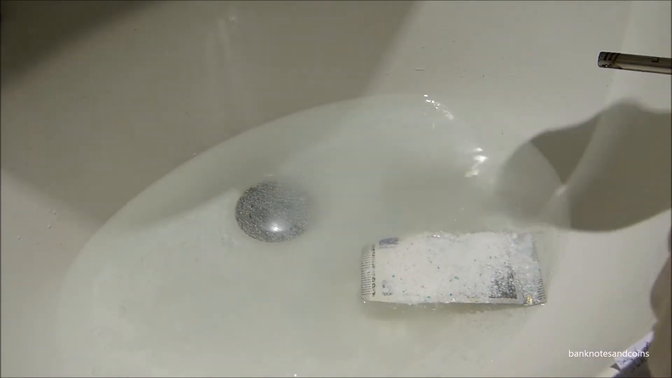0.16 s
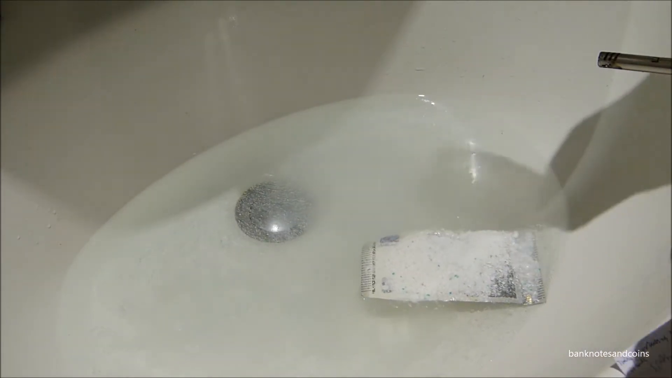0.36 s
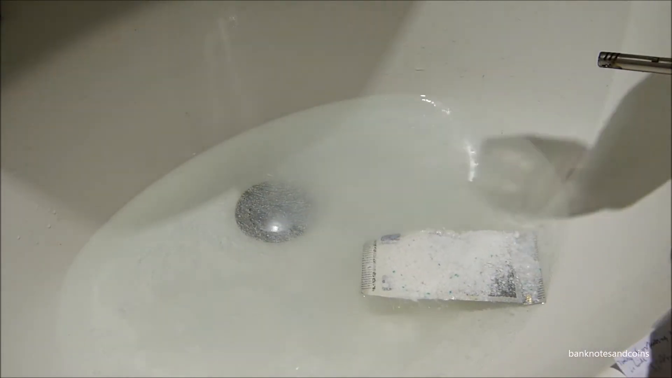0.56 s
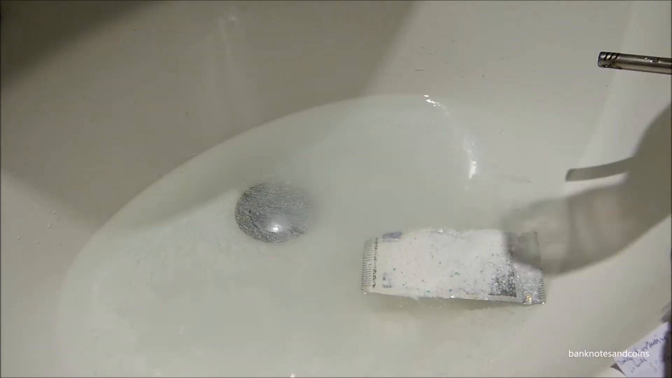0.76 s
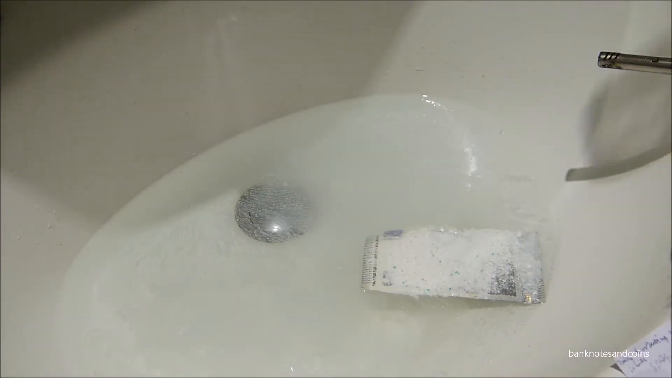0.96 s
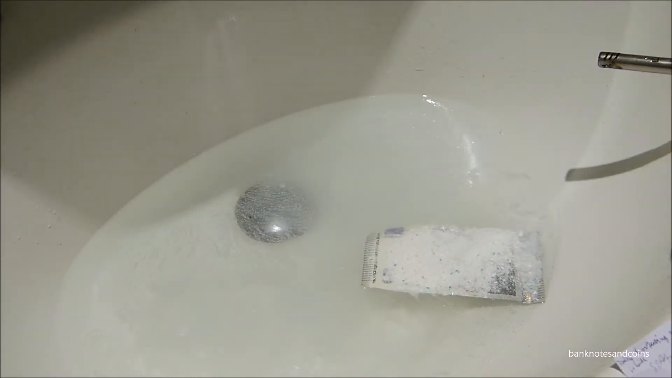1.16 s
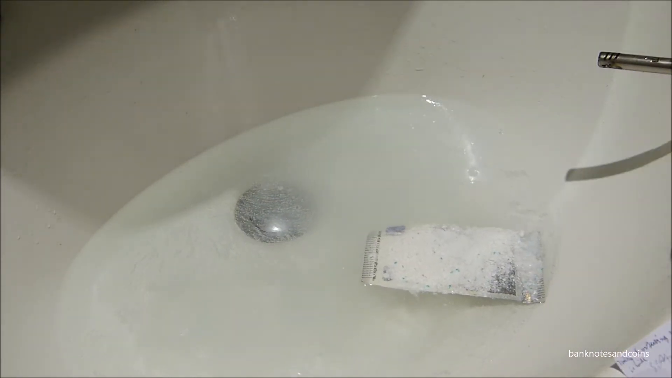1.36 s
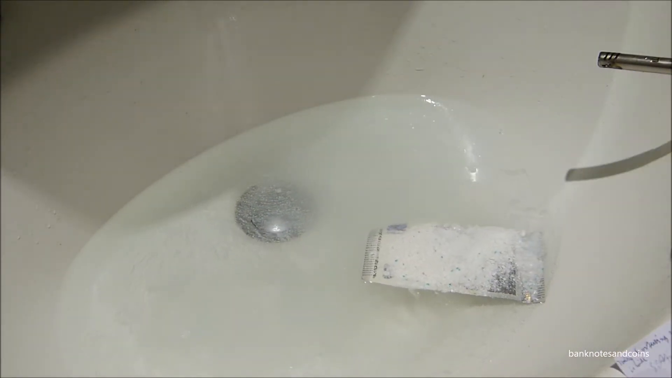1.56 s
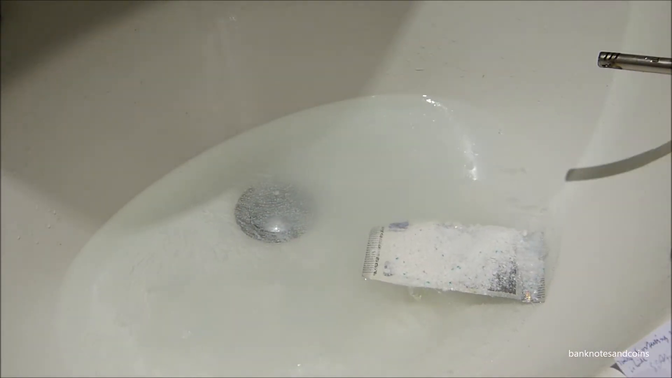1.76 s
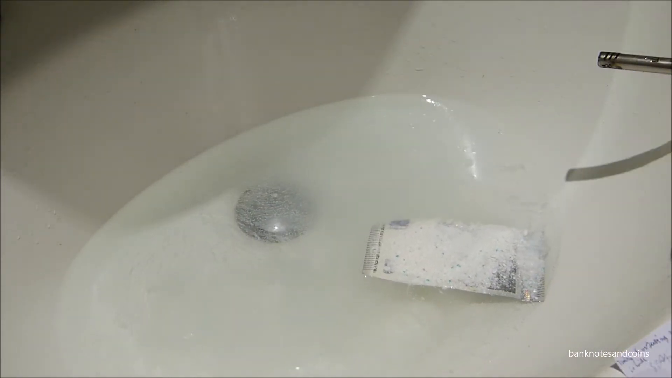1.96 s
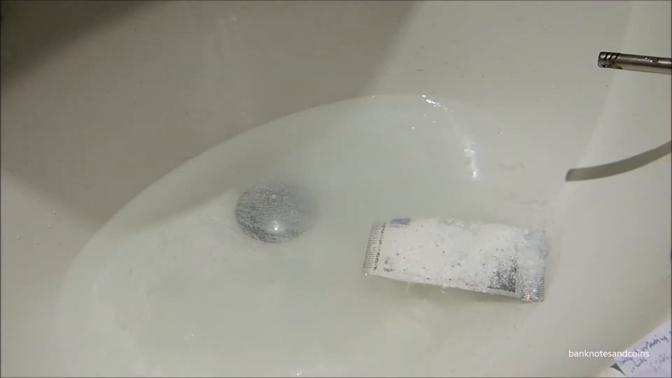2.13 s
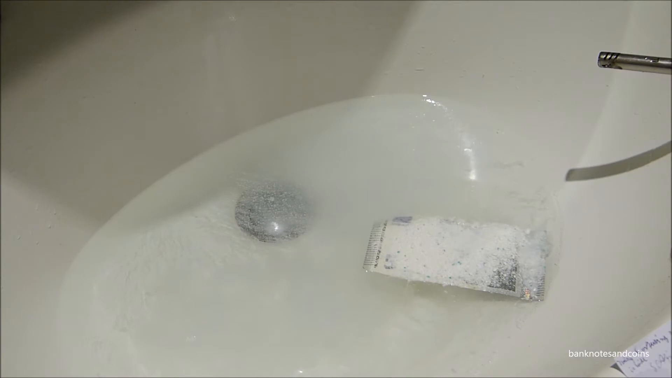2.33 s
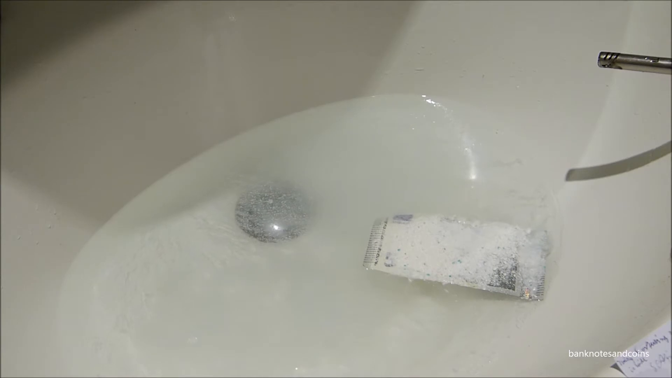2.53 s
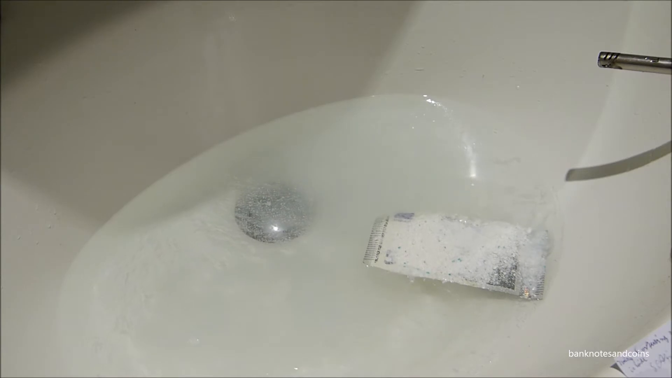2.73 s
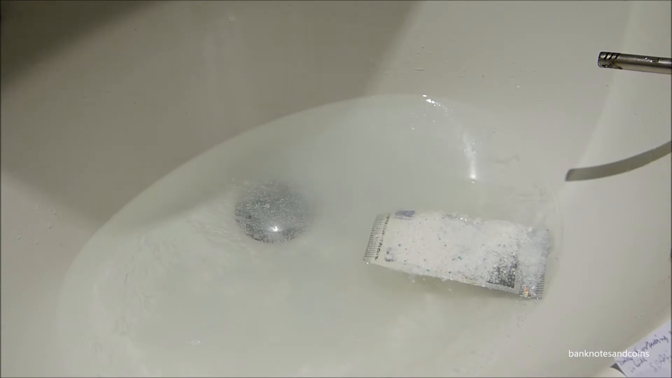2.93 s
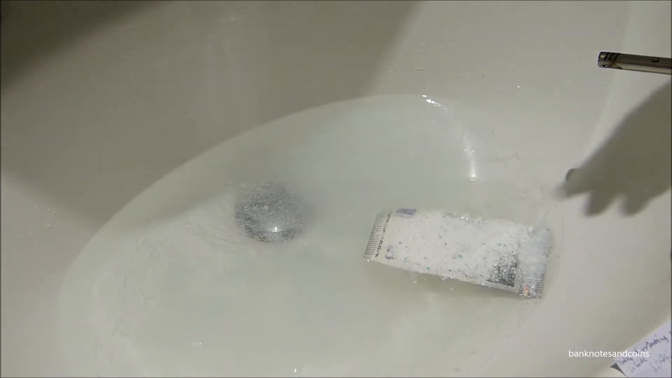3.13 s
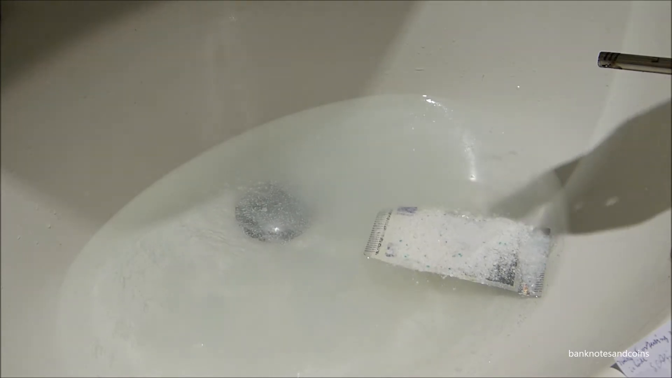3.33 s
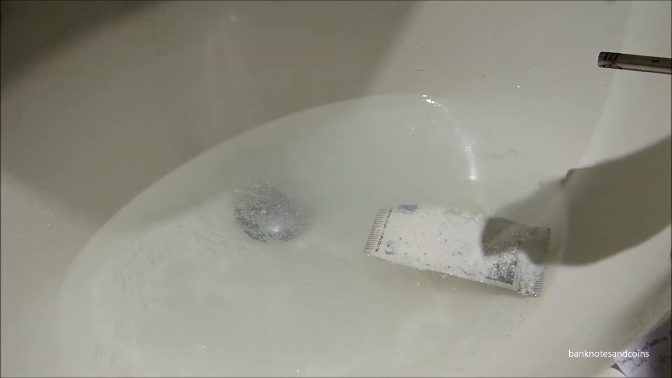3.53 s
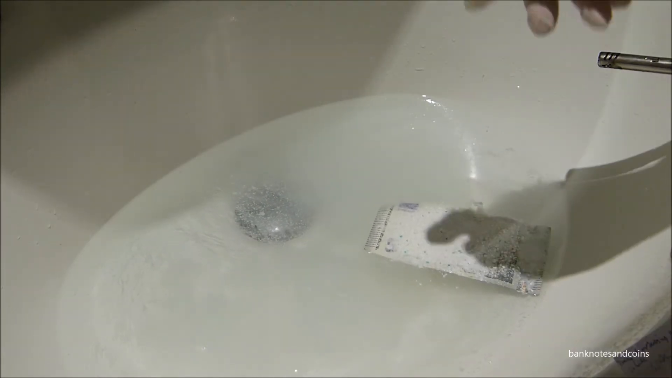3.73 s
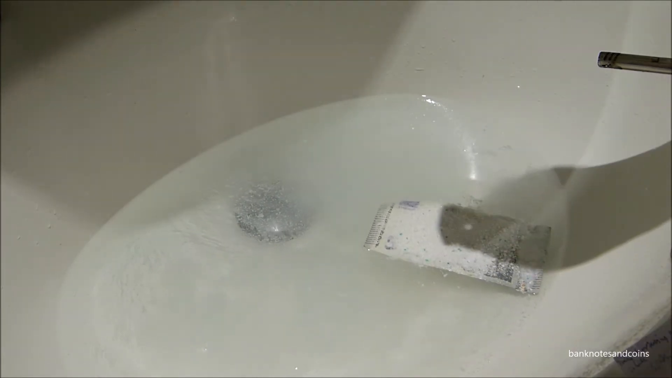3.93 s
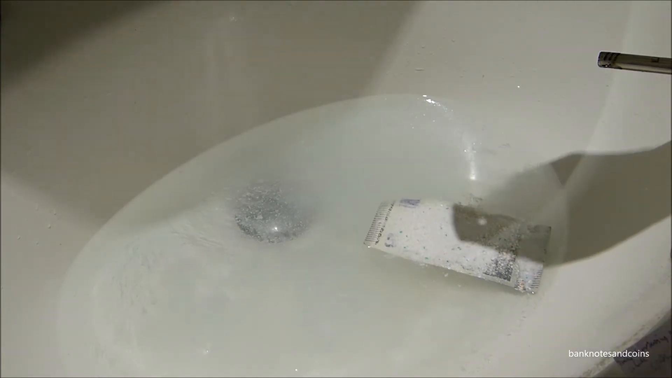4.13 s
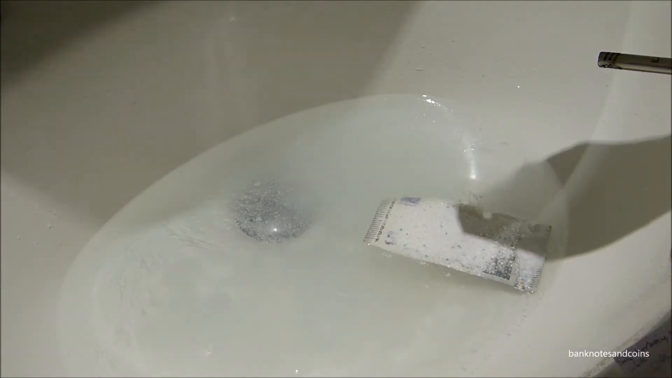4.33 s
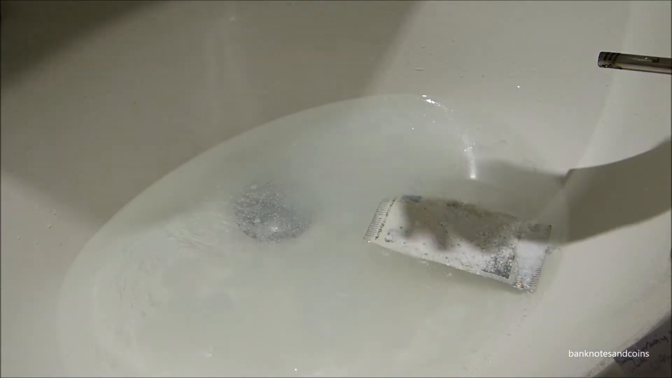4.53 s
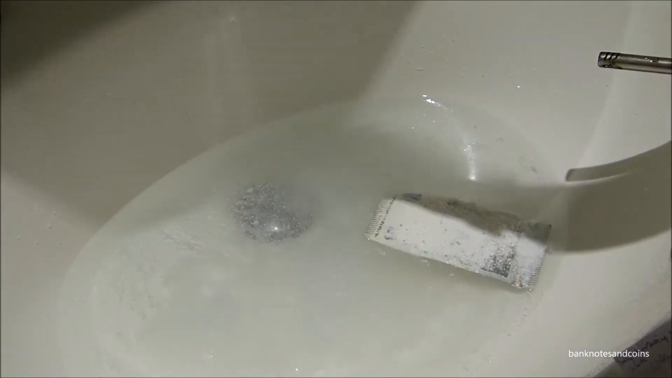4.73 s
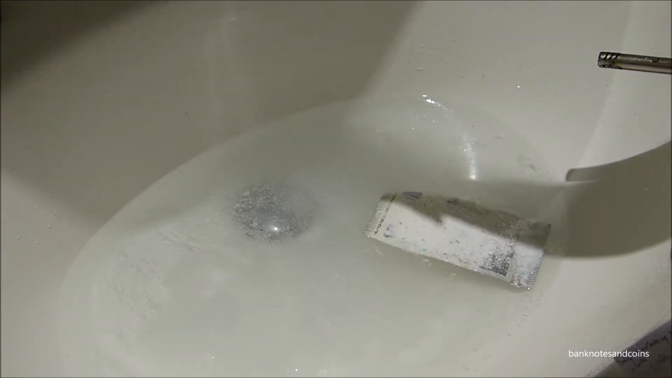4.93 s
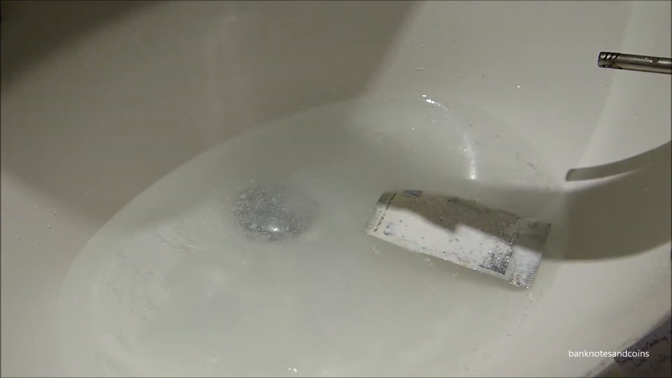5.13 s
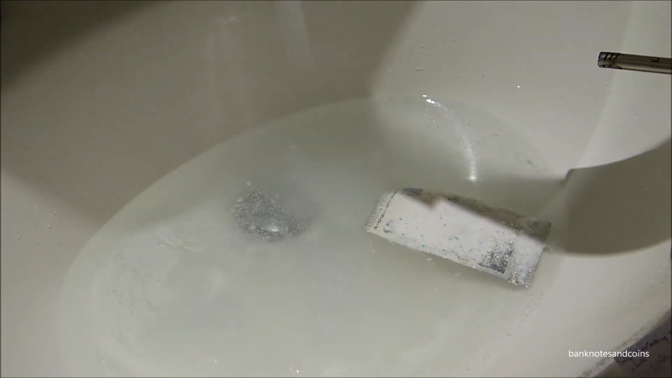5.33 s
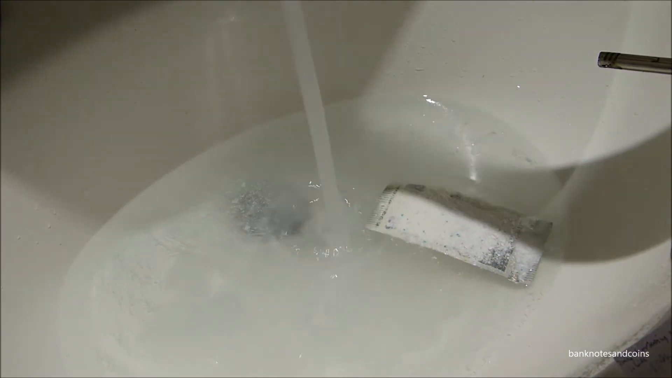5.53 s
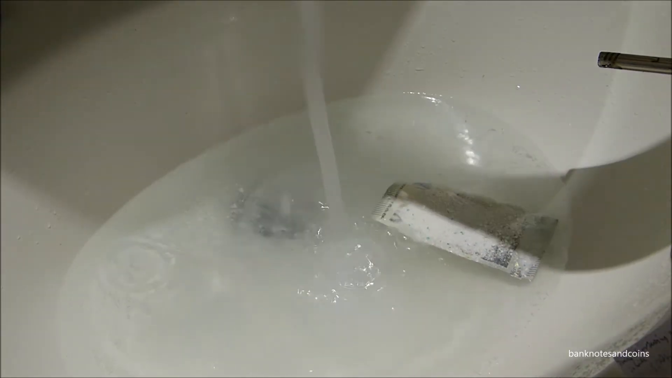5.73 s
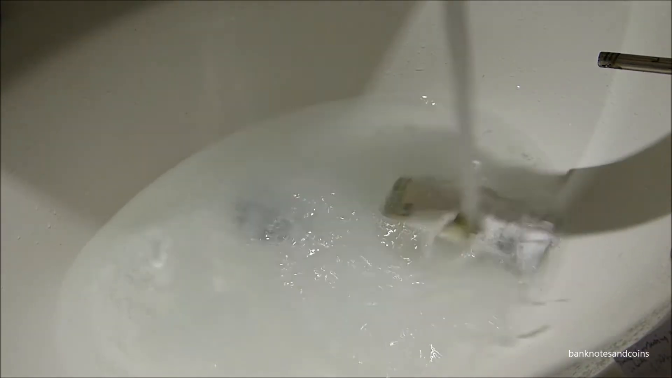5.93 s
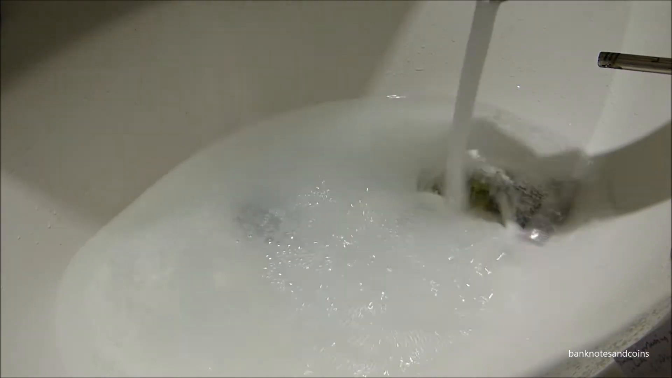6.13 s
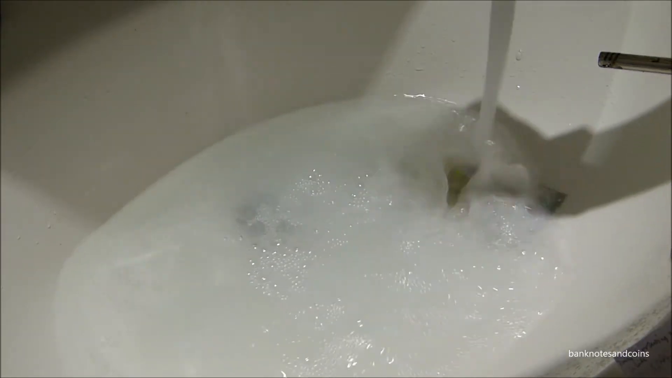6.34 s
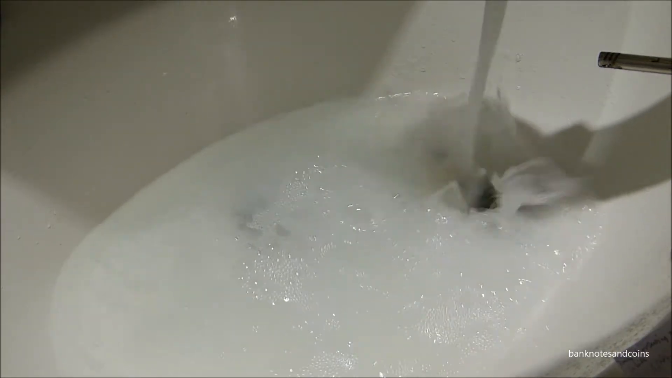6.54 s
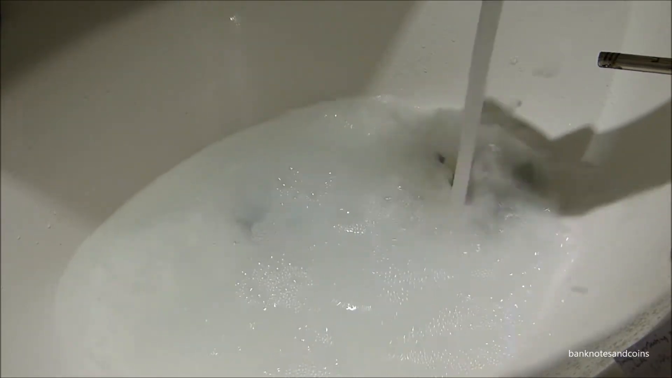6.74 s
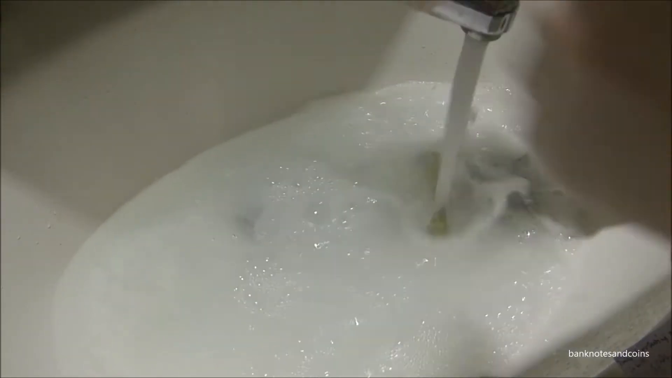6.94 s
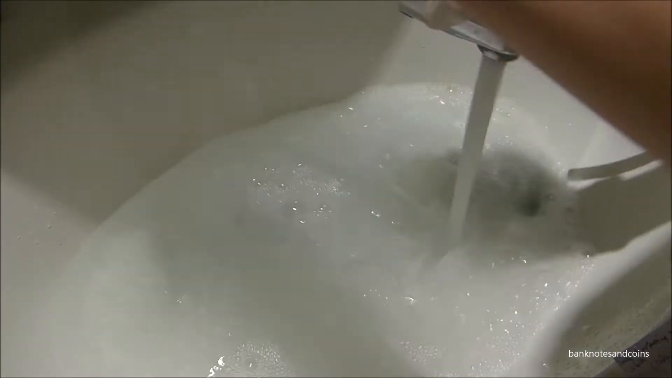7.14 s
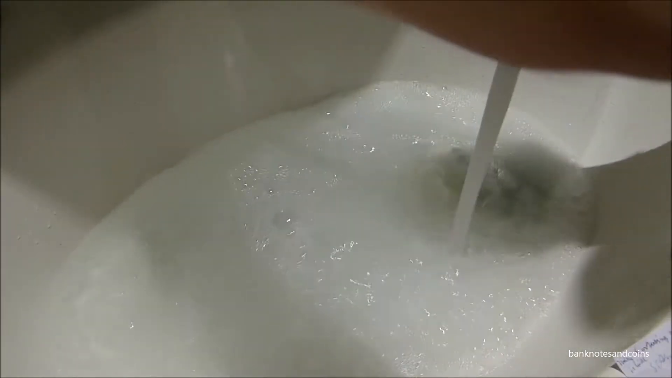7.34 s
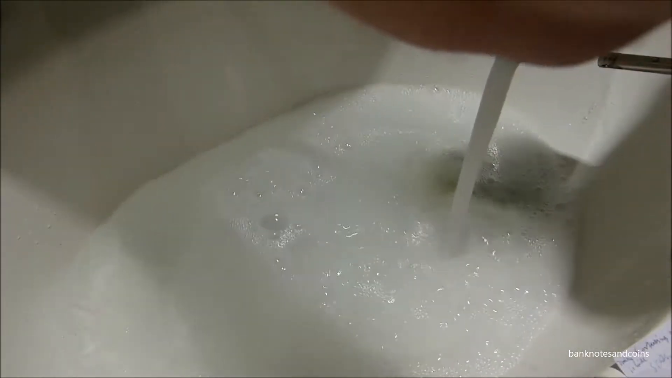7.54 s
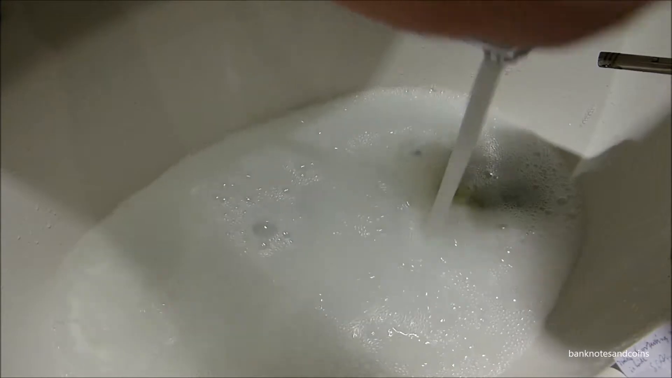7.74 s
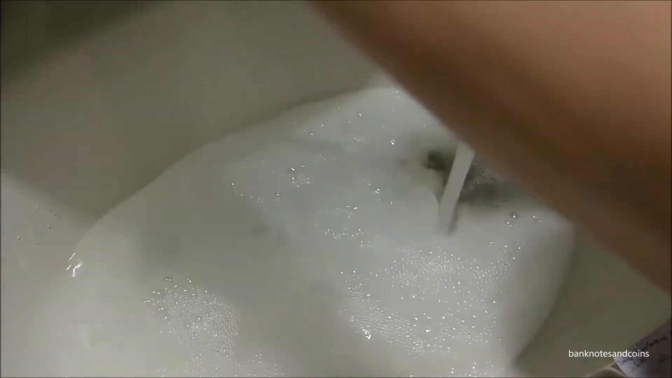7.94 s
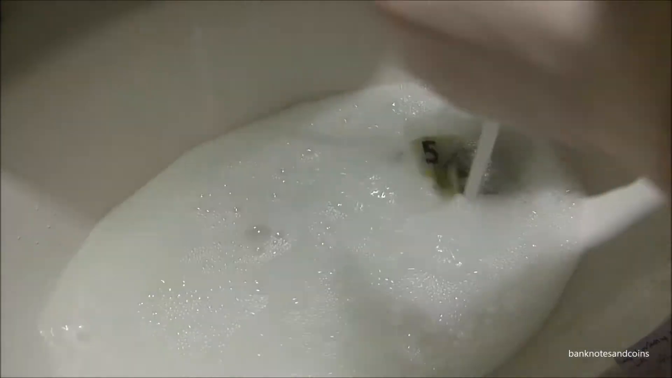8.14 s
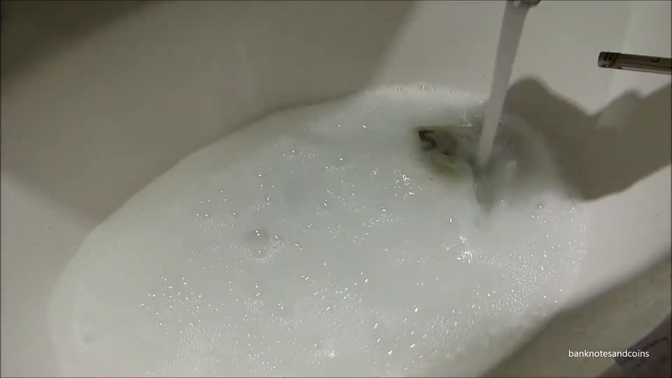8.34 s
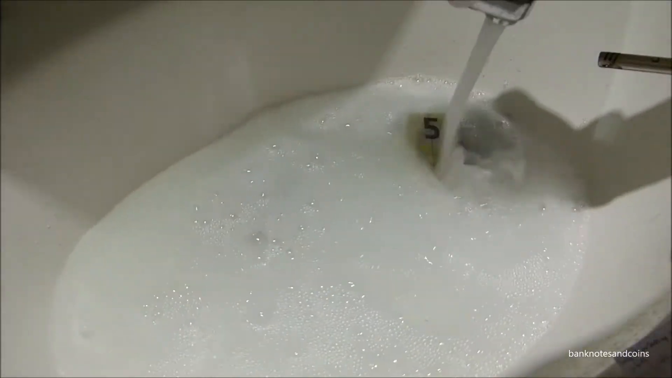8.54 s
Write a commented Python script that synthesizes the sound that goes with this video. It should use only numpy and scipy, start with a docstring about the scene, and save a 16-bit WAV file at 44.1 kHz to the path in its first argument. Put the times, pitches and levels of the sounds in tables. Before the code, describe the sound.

In a small tiled bathroom, a box of powder is shaken, scraped and knocked down before a hard jet of tap water churns foamy water.

```python
"""Powder and a running tap

In a small tiled bathroom powder hisses from its carton, which is shaken, slid and set down with hollow knocks.
Then the tap opens: the jet hisses, spatters and drags gulping air pockets under the foam, close to the
microphones. A bird chirps far outside. Noise bursts ring resonances for the knocks, grains make the powder
and the hiss, swelling sines make the bubbles, and random sparse echoes make the room.
"""
import sys
import numpy as np
from scipy import signal
from scipy.fft import rfft, irfft
from scipy.io import wavfile
from scipy.ndimage import map_coordinates

SR = 44100
rng = np.random.default_rng(int(sys.argv[2]) if len(sys.argv) > 2 else 0)


def to_wav(sig):
    """Store sig (one row per channel, or 1-D mono) as 16-bit WAV at the path in sys.argv[1].

    Samples outside -1..1 are clipped; the rate is SR.
    """
    pcm = np.clip(np.atleast_2d(sig), -1, 1) * 32767
    pcm = np.round(pcm).astype(np.int16)
    wavfile.write(sys.argv[1], SR, pcm.T)  # frames by channels


N = 378819
T = np.arange(N) / SR
HZ = np.fft.rfftfreq(4096, 1 / SR)
EDGE_HZ = 15950  # top of the recorder's band
OPEN_S = 5.27  # the tap opens

# blows on carton, basin and tap, levels before trim:
# [t/s, chatter decay/s, thud/dB, clack/dB, tick/dB, thud f/Hz, clack f/Hz, top of the tick f/Hz]
BLOWS = [(0.058, 0.0037, -69, -67, -35, 350, 1980, 11000), (0.148, 0.0027, -74, -58, -48, 400, 1500, 11000),
         (0.202, 0.0027, -77, -63, -57.5, 550, 1560, 5000),
         (1.015, 0.0038, -90, -53.5, -49, 340, 2390, 7800),
         (1.313, 0.0088, -49, -38.5, -40.5, 670, 1690, 9000),
         (1.602, 0.0083, -52.5, -72, -75, 440, 1330, 9000),
         (1.716, 0.017, -60, -44.5, -50, 623, 1180, 9000),
         (1.907, 0.0089, -48.5, -45, -63, 468, 1060, 4000),
         (1.982, 0.0035, -46, -32.5, -40, 470, 1250, 4860),
         (2.047, 0.039, -44, -37, -41.5, 470, 1520, 9800),
         (2.083, 0.017, -39.5, -32.5, -45, 540, 1370, 9000),
         (2.148, 0.011, -31.5, -31, -40.5, 430, 1290, 8900), (2.16, .007, -32, -29.5, -57, 398, 1050, 8450),
         (2.216, 0.0068, -42.5, -33.5, -47.5, 424, 1310, 9020),
         (2.317, 0.0061, -30.5, -21, -24, 378, 1210, 7100),
         (2.563, 0.008, -49, -42.5, -30.5, 450, 1860, 15100),
         (2.626, 0.003, -38.5, -31.5, -31.5, 416, 1730, 14000),
         (3.749, 0.015, -69, -62.5, -62.5, 304, 1540, 10000),
         (4.954, 0.022, -66, -63, -52, 321, 1513, 14000), (4.972, 0.0052, -59, -62, -63, 280, 940, 9000),
         (5.225, 0.0046, -66, -53, -48.5, 220, 1300, 8000), (5.267, 0.006, -59, -50, -48, 220, 1700, 7000),
         (5.279, 0.013, -51, -44.5, -64, 500, 840, 5000),
         (5.6023, 0.002, -37.5, -22, -22, 610, 2040, 14000),
         (5.8949, 0.0021, -40, -20.5, -31.5, 420, 1100, 9000),
         (5.903, 0.026, -39.5, -41, -55, 540, 940, 4000), (7.573, 0.0056, -40, -30, -24, 390, 1446, 11060)]
# spectral shape of moving powder: [f/Hz, level/dB]
POWDER_SHAPE = [(150, -16), (600, -1), (1100, -4), (1600, -3), (2500, 1.5), (4200, 2), (5500, 6),
                (8000, 6.5), (10000, -0.5), (15000, -23)]
# the jet breaks up in surges of spray, levels before trim: [centre t/s, level/dB, bubble cloud f/Hz]
JET_SURGES = [(5.522, -28.5, 6760), (5.567, -23, 3320), (5.587, -28.5, 2950), (5.99, -24.5, 10000),
              (6.02, -19.5, 2500), (6.136, -22.5, 3440), (6.17, -27.5, 3320), (6.323, -25.5, 4940),
              (6.41, -22, 4830), (6.535, -25, 10000), (6.591, -21.5, 6080), (6.668, -24, 3320),
              (6.705, -28, 8080), (6.766, -27.5, 4570), (6.812, -22, 5660), (6.876, -25.5, 8670),
              (6.941, -23.5, 6760), (7.063, -22.5, 2780), (7.125, -22.5, 4140), (7.276, -28.5, 5350),
              (7.682, -28, 2990), (7.795, -28.5, 3420), (7.898, -29, 2880), (7.997, -28, 4320),
              (8.092, -24, 3020), (8.166, -26, 7700), (8.208, -30.5, 4110), (8.425, -24, 4740),
              (8.456, -24, 4500)]
# trapped air splits into a small ringing bubble and a large gulping pocket, levels before trim:
# [t/s, bubble level/dB, bubble f/Hz, bubble's swell/cycles, gulp level/dB, gulp f/Hz]
AIR_PLOPS = [(5.5649, -20, 3200, 6, -63.3, 720), (6.021, -13.6, 2020, 4, -44, 720),
             (6.133, -21, 3448, 6.9, -52.5, 360), (6.2363, -15, 2300, 3, -43, 601),
             (6.2938, -18.5, 2099, 2.6, -48.2, 720), (6.3529, -21.5, 2360, 5.5, -39.5, 699),
             (6.4005, -19.0, 2389, 3.2, -37, 472), (6.435, -13, 3560, 3.5, -21.5, 477),
             (6.5747, -14.2, 2270, 3, -28, 507), (6.619, -26, 1884, 2.8, -19.5, 620),
             (6.7335, -15.8, 1890, 0.95, -30, 690), (6.7488, -19, 2054, 3, -40, 601),
             (6.8139, -18.5, 2389, 5.5, -21, 650), (6.9325, -21, 1830, 8.3, -39, 720),
             (7.029, -21.5, 1310, 3.7, -56.5, 720), (7.0478, -23, 3095, 9.1, -39, 665),
             (7.0587, -22, 2450, 1.9, -28.5, 590), (7.174, -12.5, 1920, 0.77, -22, 563),
             (7.1986, -41.7, 1585, 7.5, -25.5, 520), (7.2232, -16, 2080, 4, -45, 406),
             (7.2394, -19.3, 1551, 1.6, -40.8, 487), (7.2688, -19.5, 1610, 6.9, -25.5, 406),
             (7.3107, -15, 1980, 3.5, -26, 445), (7.3955, -29.5, 2660, 6.9, -31, 560),
             (7.7921, -18, 3200, 1.5, -22.7, 605), (7.8842, -19, 1550, 1.1, -25.5, 549),
             (8.106, -28, 2549, 2.4, -25.5, 520), (8.2179, -45, 1766, 7.5, -25.0, 506),
             (8.3166, -32, 2099, 4, -30.5, 549), (8.4165, -23.1, 1540, 2.2, -29.5, 610),
             (8.4554, -27, 3600, 1.5, -56.5, 533), (8.4941, -27.5, 1800, 7.9, -27, 600),
             (8.5556, -20, 2180, 3.9, -21.5, 465)]


def amp(db):
    """Decibels to gain."""
    return 10 ** (np.asarray(db) / 20)


def evened(x):
    """Scales to rms 1."""
    return x / np.sqrt(np.mean(x ** 2) + 1e-20)


def read(points, hz):
    """A spectrum's value at hz, interpolated over log frequency."""
    f, value = np.transpose(points)
    return np.interp(np.log(hz + 1), np.log(f + 1), value)


def level(rows):
    """Gain over time from a dB curve; silent before it starts."""
    rows = np.array(rows)
    return np.interp(T, rows[:, 0], amp(rows[:, 1]), left=0)


def add(mix, s, sound):
    """Mixes a sound in at time s."""
    part = mix[max(round(s * SR), 0):][:len(sound)]
    part += sound[:len(part)]


def high_pass(x, order, hz):
    """Butterworth high-pass."""
    return signal.sosfilt(signal.butter(order, hz, "high", fs=SR, output="sos"), x)


def colour(x, points, lo=10, hi=30000):
    """Causal minimum-phase filter with the given spectrum, limited to the band lo-hi."""
    band = 1 / np.sqrt((1 + (lo / (HZ + 1)) ** 10) * (1 + (HZ / hi) ** 10))
    log_gain = np.log(amp(read(points, HZ)) * band + 1e-6)
    # folding the cepstrum onto positive time gives minimum phase
    cepstrum = irfft(log_gain)[:len(HZ)]
    cepstrum[1:-1] *= 2
    taps = irfft(np.exp(rfft(cepstrum, 2 * len(HZ) - 2)))
    return signal.oaconvolve(x, taps)[:len(x)]


def resonate(x, hz, width):
    """One resonance of gain 1 at its peak."""
    return signal.lfilter(*signal.iirpeak(hz, hz / width, SR), x)


def resonate_twice(x, hz, width):
    """Two equal resonances in a row, for steeper skirts."""
    return resonate(resonate(x, hz, width), hz, width)


def hollow(x, modes):
    """A cavity adds its resonances to the sound that passes through it."""
    return x + sum(amp(db) * resonate(x, hz, width) for hz, width, db in modes)


def drift(per_s):
    """Slow random wander of rms 1."""
    knots = np.arange(0, T[-1] + 1, 1 / per_s)
    return evened(np.interp(T, knots, rng.standard_normal(N)[:len(knots)]))


def grains(per_s, spread_db):
    """Sparse clicks of random sign, mostly small and a few large."""
    size = amp(spread_db * np.minimum(rng.exponential(1, N), 4))
    return size * rng.choice([-1, 1], N) * (rng.random(N) < per_s / SR)


def swell_power(s, db, width):
    """Power over time of a bell-shaped swell, halved one width (s) from its centre."""
    return amp(db) ** 2 * 2 ** -np.minimum(((T - s) / width) ** 2, 60)


def tail(t60s):
    """Sparse echoes of random sign, each band dying at its own speed; energy 1."""
    taps = rng.standard_normal(SR) * (rng.random(SR) < .15) * (np.arange(SR) > SR // 300)
    hz, t, z = signal.stft(taps, SR, nperseg=256)
    decay = amp(-60 * t / read(t60s, hz)[:, None])
    echo = signal.istft(z * decay, SR, nperseg=256)[1]
    return echo / np.linalg.norm(echo)


def room(x, wet_db, apart_db, sides, balance):
    """Direct sound plus tiled walls: echoes shared by both microphones and echoes that differ."""
    # ring time of the room: [f/Hz, t60/s]
    room_t60 = [(150, 0.14), (400, 0.34), (1000, 0.21), (2800, 0.2), (7300, 0.17), (15000, 0.037)]
    shared, apart = (signal.oaconvolve(x, tail(room_t60))[:N] for _ in range(2))
    mid = x + amp(wet_db) * shared
    side = amp(apart_db) * colour(apart, sides)
    # left is mid plus side, right is mid minus side; each takes half of the balance
    pair = [colour(mid + way * side, [(hz, way * db / 2) for hz, db in balance]) for way in (1, -1)]
    return np.array(pair) / np.hypot(1, amp(wet_db))


def air(apart=1.0, level_db=-67.5):
    """The quiet steady noise of the room, with a faint drone rung out of it."""
    # spectral shape of the noise: [f/Hz, level/dB]
    air_shape = [(12, -37), (20, -10), (91, -12), (123, -6), (210, -10.5), (347, -6), (513, -10),
                 (558, -11), (1060, -12), (1370, -12.5), (3070, -18.5), (6910, -22), (8890, -19),
                 (16000, -31.5)]
    # the drone: [f/Hz, width/Hz, level/dB]
    hum = [(327, 6.7, -84.5)]
    mid, side = (evened(colour(rng.standard_normal(N), air_shape)) for _ in range(2))
    drone = sum(amp(db) * evened(resonate(mid, hz, width)) for hz, width, db in hum)
    return amp(level_db) * np.array([mid + apart * side, mid - apart * side]) + drone


def bird(trill_hz=55, sweep=0.25, waver=0.0275, whistle_db=-6, arch=0.0392, t60=0.56):
    """Each call holds a whistle under a fast trill that flicks upward, smeared by echoes on its long way in."""
    # calls: [start t/s, length/s, level/dB, f/Hz before arch and waver]
    calls = [(0.334, 0.22, -57, 3045), (2.726, 0.13, -56.5, 2860), (3.068, 0.16, -58, 2880),
             (4.83, 0.108, -56, 2900), (5.106, 0.15, -57.5, 2945)]
    out, wander = np.zeros(N), drift(150)
    for s, length, db, hz in calls:
        t = np.arange(int(length * SR)) / SR
        swell = np.sin(np.pi * t / length)
        chance = wander[int(s * SR):][:len(t)]
        held = hz * (1 + waver * chance + arch * (swell - 1))
        flick = (1 + np.sin(2 * np.pi * trill_hz * t + chance)) / 2
        flicked = held * (1 + sweep * np.sqrt(swell) * flick)
        whistle, trill = np.sin(2 * np.pi * np.cumsum([held, flicked], axis=1) / SR)
        add(out, s, amp(db) * evened((amp(whistle_db) * whistle + trill) * np.sqrt(swell)))
    return np.array([signal.oaconvolve(out, tail([(3000, t60)]))[:N] for _ in range(2)])


def trickle(per_s=5000, spread_db=3, low_hz=3000, trim_db=-3):
    """A thin hiss of fine powder grains trickles on between the shakes and scrapes."""
    # powder trickling, before trim: [t/s, level/dB]
    trickling = [(0.0, -58), (0.43, -64.5), (0.9, -61.5), (1.48, -69), (2.04, -64.5), (2.21, -57.5),
                 (2.41, -86), (2.55, -58.5), (2.83, -63.5), (4.27, -70.5), (4.56, -71), (4.78, -69),
                 (5.06, -62), (5.3, -63)]
    hiss = evened(colour(grains(per_s, spread_db), POWDER_SHAPE, low_hz))
    return amp(trim_db) * level(trickling) * hiss


def slides(body_hz=200, hollow_hz=1250, hiss_hz=2200, gap_hz=3000, grit=1.0, lumps_per_s=130,
           lump_size=13, ring_db=9, ring_width_hz=280, trim_db=0):
    """Powder and carton slide in swells: fine grains hiss, and separate lumps tap on the hollow box."""
    # shakes of powder out of the carton: [centre t/s, hiss level/dB]
    shaken = [(0.088, -51), (0.138, -48), (0.188, -50.5), (0.69, -58.5), (0.77, -55.5), (0.819, -57),
              (0.921, -56.5), (1.089, -63)]
    # scrapes of the carton and brushes of the hand:
    # [centre t/s, hollow level/dB, hiss level/dB, standard deviation of the power bell/s]
    scraped = [(1.209, -65, -49, .01), (1.363, -42.5, -45, 0.015), (1.636, -54.5, -50, 0.02),
               (1.751, -44.5, -42.5, 0.014), (1.798, -45.5, -53, 0.0089), (2.001, -38.5, -52.5, 0.0052),
               (2.092, -46, -45, 0.019), (2.166, -49, -42.5, 0.0045), (2.351, -38.5, -50, 0.019),
               (2.441, -51, -50, 0.011), (2.554, -39.5, -39, 0.0042), (2.731, -63.5, -49.5, 0.024),
               (3.169, -79, -55.5, 0.0062), (4.58, -79, -61.5, 0.031), (4.669, -74, -52, 0.021),
               (4.85, -80, -56.5, 0.056), (4.96, -69, -57.5, 0.037)]
    out, t = np.zeros(N), np.arange(SR // 2) / SR
    bands = [(body_hz, hollow_hz), (hollow_hz, hiss_hz), (gap_hz, EDGE_HZ)]
    # body, hollow and hiss dB, then bell width 0.01 s and the hollow's pitch in Hz
    moves = [(s, db - 29, db - 1.5, db, 0.01, 1520) for s, db in shaken]
    moves += [(s, db - 4, db, hiss_db, width, 1240) for s, db, hiss_db, width in scraped]
    for s, *levels_db, width, ring_hz in moves:
        lead = min(s, t[-1] / 2)
        noise, size = rng.standard_normal((2, len(t)))
        fine = noise * np.exp(grit * np.minimum(size, 2))
        lumps = np.sign(noise) * (rng.random(len(t)) < lumps_per_s / SR)
        coarse = fine / 2 + 2 * lump_size * lumps
        ringing = coarse + amp(ring_db) * resonate(coarse, ring_hz, ring_width_hz)
        swell = np.exp(-((t - lead) / width) ** 2 / 4)
        swell_rms = np.sqrt(np.mean(swell ** 2))
        for db, (lo, hi), drive in zip(levels_db, bands, [coarse, ringing, fine]):
            part = evened(swell * colour(drive, POWDER_SHAPE, lo, hi))
            add(out, s - lead, amp(db + trim_db) * swell_rms * part)
    return out


def carton(x, trim_db=-3):
    """The box colours whatever slides in it."""
    # resonances of the powder carton, against the direct sound: [f/Hz, width/Hz, level/dB]
    box_modes = [(453, 28, -1.5), (680, 25, 7), (895, 27, -5.5), (1119, 25, -5.5), (1580, 220, -12.5),
                 (4130, 130, 5.5)]
    return amp(trim_db) * hollow(x, box_modes)


def knocks(thud_edge_hz=120, clack_edge_hz=600, tick_edge_hz=2400, sharpness=3.5, focus_db=8,
           grit=0.67, trim_db=-1):
    """Each blow is a crack and a short chatter, ringing low, middle and high resonances of its own."""
    # harder contacts tick higher: [tick over clack/dB, tick f/Hz]
    tick_pitch = [(1, 2100), (7, 6900)]
    # spectral shape of all blows: [f/Hz, level/dB]
    knock_shape = [(59, -61), (100, -13.5), (176, -7), (324, -10), (367, -17), (416, -7.5), (885, -6),
                   (1140, 2), (1240, -2), (1840, -5), (2230, -14.5), (3680, -9), (5960, -11), (7830, -9),
                   (15000, -26)]
    out, t = np.zeros(N), np.arange(SR // 5) / SR
    for s, decay, thud_db, clack_db, tick_db, thud_hz, clack_hz, top_hz in BLOWS:
        edges = [thud_edge_hz, clack_edge_hz, tick_edge_hz, top_hz]
        tick_hz = np.interp(tick_db - clack_db, *np.transpose(tick_pitch))
        noise, size = rng.standard_normal((2, len(t)))
        # each millisecond of chatter has its own force
        contacts = np.exp(grit * np.minimum(size, 2))[(t * 1000).astype(int)]
        drive = evened(noise * contacts) * np.exp(-t / max(decay, .001))
        drive[0] += 4  # the crack of first contact
        levels_db, pitches = [thud_db, clack_db, tick_db], [thud_hz, clack_hz, tick_hz]
        for db, hz, lo, hi in zip(levels_db, pitches, edges, edges[1:]):
            part = colour(drive, knock_shape, lo, hi)
            part = part + amp(focus_db) * resonate(part, hz, hz / sharpness)
            add(out, s, amp(db + trim_db) * part / np.std(part[:SR // 50]))  # level of the first 20 ms
    return out


def struck(modes, detune=0.028, roughness=.6, shiver_s=.005):
    """One blow's ring: the grip shifts every mode a little, and each level shivers at random, roughening it."""
    t, ring = np.arange(SR // 3) / SR, 0
    for hz, db, t60 in modes:
        chance = rng.standard_normal(200)
        shiver = 1 + roughness * np.interp(t / shiver_s, np.arange(len(chance)), chance)
        tone = np.sin(2 * np.pi * hz * (1 + detune * chance[-1]) * t)
        ring = ring + amp(db - 60 * t / t60) * shiver * tone
    return ring


def carton_rings(lowered_s=1.2, let_go_s=2.5, panel_db=-4, rim_db=0):
    """The carton's side rings with each knock while it is put down, and its rim with each hard contact."""
    # the rim clacks on something hard: [t/s, level/dB]
    rim_hits = [(1.314, -36), (2.5652, -25), (2.6267, -16.5)]
    # what rings in the rim, before detuning: [f/Hz, level/dB, t60/s]
    rim_modes = [(1018, -10, 0.032), (1687, -7, 0.041), (1810, -3.5, .028), (3810, -6, 0.018),
                 (4000, -12, .03), (8090, -5.5, 0.02)]
    # what rings in the side, before detuning: [f/Hz, level/dB, t60/s]
    panel_modes = [(507, -17, .13), (673, -10.5, .12), (1006, -5, 0.11), (1153, -4.5, 0.14),
                   (1185, -0.5, .2), (1470, -7.5, .11)]
    out = np.zeros(N)
    for s, _, _, clack_db, *_ in BLOWS:
        if lowered_s < s < let_go_s:
            add(out, s, amp(clack_db + panel_db) * struck(panel_modes))
    for s, db in rim_hits:
        add(out, s, amp(db + rim_db) * struck(rim_modes))
    return high_pass(out, 4, 350)


def thumps(focus_octaves=.45, attack_s=0.0018, boom_t60=0.29, puff_db=-2, puff_s=.018):
    """A heavy push is a broad dull thud that sets the basin booming, most strongly near its own pitch."""
    # thumps from heavy blows and from water surging in the pipe: [t/s, level/dB, f/Hz]
    pushes = [(1.317, -57, 158), (1.621, -64, 160), (2.151, -52, 167.7), (2.32, -48.5, 178),
              (2.627, -38.5, 187), (5.277, -48, 158), (5.361, -41.5, 180), (5.602, -61, 170)]
    # low modes of the whole basin: [f/Hz, level/dB]
    boom_modes = [(125, 3), (150, 4.5), (172, -1), (192, 3), (222, 5.5), (262, -11.5)]
    out, t = np.zeros(N), np.arange(SR // 2) / SR
    for s, db, pitch in pushes:
        ring = 0
        for hz, mode_db in boom_modes:
            nearness = np.exp(-(np.log2(hz / pitch) / focus_octaves) ** 2)
            ring = ring + amp(mode_db) * nearness * np.sin(2 * np.pi * (hz * t + rng.random()))
        ring = ring * amp(-60 * t / boom_t60)
        puff = evened(resonate_twice(rng.standard_normal(len(t)), pitch, 2 * pitch)) * np.exp(-t / puff_s)
        thud = (ring / np.std(ring[:SR // 30]) + 2 * amp(puff_db) * puff) / np.sqrt(2)
        add(out, s, amp(db) * thud * (1 - np.exp(-t / attack_s)))
    return high_pass(out, 4, 100)


def basin(x, ring_db):
    """The bowl rings on after whatever excites it."""
    # modes of the basin and what stands on it, against each other: [f/Hz, level/dB]
    basin_modes = [(150, -4.5), (192, -1), (327, 3), (391, 2.5), (437, -2.5), (533, -7), (678, -5.5),
                   (758, 5), (1010, 4), (1110, -8), (1250, -5)]
    # their ring times: [f/Hz, t60/s]
    basin_t60 = [(150, .33), (330, .27), (700, .2), (1800, .16)]
    t, ring = np.arange(SR // 2) / SR, 0
    for hz, db in basin_modes:
        fade = amp(db - 60 * t / read(basin_t60, hz))
        ring = ring + fade * np.sin(2 * np.pi * (hz * t + rng.random()))
    return x + amp(ring_db) * signal.oaconvolve(x, ring)[:N]


def jet(order=1, opening_s=0.11, shut_db=-35):
    """Gain over time of one layer of the jet (1 hiss, 2 churning, 3 gurgle), swelling as the tap opens."""
    # the running jet, before opening and trims: [t/s, hiss level/dB, churning level/dB, deep gurgle level/dB]
    jet_curves = np.array([(5.5, -32, -41, -49), (5.56, -26, -32, -52), (5.66, -31, -34, -46),
                           (5.79, -28, -36.5, -43), (5.95, -26, -28.5, -37), (6.11, -26, -27, -50),
                           (6.31, -26.5, -30, -45.5), (6.62, -26, -30, -44), (7.01, -28, -29.5, -46.5),
                           (7.19, -27, -26.5, -42), (7.41, -31, -34.5, -43.5), (7.67, -29.5, -32, -45.5),
                           (8.39, -28.5, -32.5, -46), (8.59, -26.5, -27.5, -40)])
    shut = np.clip(1 - (T - OPEN_S) / opening_s, 0, 1)
    curve_db = np.interp(T, jet_curves[:, 0], jet_curves[:, order])
    return (T > OPEN_S) * amp(curve_db + shut_db * shut)


def running(x):
    """Scales to rms 1 while the tap runs."""
    return x / np.std(x[T > OPEN_S])


def rubbed(modes):
    """Irregular slips ringing a few resonances, rms 1."""
    slips = grains(1500, 3.4)
    return evened(sum(amp(db) * evened(resonate(slips, hz, width)) for hz, width, db in modes))


def tap_body(pipe_db=-43):
    """The hand rubs on the tap, the pipe rumbles, and the spout grinds round on its base as it turns."""
    # the hand's rubbing: [t/s, level/dB]
    rub = [(3.56, -88), (3.63, -67.5), (3.72, -60), (3.76, -65.5), (3.8, -85)]
    # resonances of the rubbed tap: [f/Hz, width/Hz, level/dB]
    rub_modes = [(216, 18, 6), (393, 40, 2), (915, 50, -3), (1504, 30, 0.5), (1910, 45, -4)]
    # turns of the spout: [centre t/s, level/dB, half width/s]
    spout_turns = [(5.68, -58, 0.073), (5.975, -49, 0.05), (7.241, -58, 0.051), (7.59, -55, 0.042)]
    rumble = rubbed([(97.0, 18, 3), (151, 21, -3), (214.0, 14, 0.5), (334, 110, 0.5)])  # Hz, width Hz, dB
    grind = evened(colour(rumble, [(400, 0), (1000, -20)], lo=82))
    turning = np.sqrt(sum(swell_power(*turn) for turn in spout_turns))
    hand = level(rub) * rubbed(rub_modes) * (T < rub[-1][0])
    return (turning + amp(pipe_db) * jet()) * grind + hand


def bubble(hz, cycles, rise):
    """An air pocket swells over some cycles and is soon damped; its pitch climbs as it nears the surface."""
    age = np.arange(int(3.6 * cycles / hz * SR)) * hz / SR / cycles  # 1 at the peak
    turns = cycles * (age + rise * age * (age / 2 - 1))
    return np.sin(2 * np.pi * turns) * age * np.exp((1 - age ** 2) / 2)


def burbles(attack_s=0.002, trim_db=0):
    """Low hollow burbling swells up under the jet and dies away."""
    # burbles: [start t/s, level/dB, decay/s]
    burble_rows = [(5.76, -46.5, .12), (6.035, -41, 0.047), (6.438, -35.5, 0.03), (7.067, -52, 0.058),
                   (7.272, -37.5, 0.098), (7.374, -36.5, 0.043), (7.619, -51, 0.16), (7.886, -37, 0.035),
                   (7.99, -44, 0.051), (8.109, -40.5, 0.039), (8.222, -42, 0.084), (8.556, -35.5, 0.051)]
    # resonances of the burble, each passed twice at double width: [f/Hz, width/Hz, level/dB]
    burble_modes = [(324.7, 9.5, 1.5), (390, 25, 0.5), (436, 22, -13), (545, 27, -16)]
    out, t = np.zeros(N), np.arange(SR // 2) / SR
    for s, db, decay in burble_rows:
        noise = rng.standard_normal(SR)
        wobble = sum(amp(gain_db) * evened(resonate_twice(noise, hz, 2 * width))
                     for hz, width, gain_db in burble_modes)
        fade = (1 - np.exp(-t / attack_s)) * np.exp(-t / decay)
        fade_rms = np.sqrt(np.mean(fade ** 2))
        add(out, s, amp(db + trim_db) * fade_rms * evened(fade * wobble[-len(t):]))
    return high_pass(out, 8, 300)


def gulps(rise=0.021, low_hz=290, slap_db=-16, slap_s=0.0063, trim_db=1, scatter_db=3,
          scatter_octaves=0.21, count=15, stray_db=-33, stray_hz=567, swell_cycles=1.2):
    """The surface slaps shut over a large pocket of air, which rings briefly in the foam."""
    rings, slaps, t = np.zeros(N), np.zeros(N), np.arange(SR // 25) / SR
    pockets = [(s, db, hz) for s, *_, db, hz in AIR_PLOPS]
    # stray pockets, one at a random time in each equal slot
    slots = np.linspace(AIR_PLOPS[1][0], T[-1], count, endpoint=False)
    for s, (late, size, pitch) in zip(slots, rng.random((count, 3))):
        when = s + late * (slots[1] - slots[0])
        db = stray_db + scatter_db * (2 * size - 1)
        pockets.append((when, db, stray_hz * 2 ** (scatter_octaves * (2 * pitch - 1))))
    for s, db, hz in pockets:
        add(rings, s, amp(db + trim_db) * bubble(hz, swell_cycles, rise))
        add(slaps, s, amp(db + slap_db) * rng.standard_normal(len(t)) * np.exp(-t / slap_s))
    slap_shape = [(200, 0.5), (600, 15.5), (2200, 24.5), (8000, 17.0), (15000, -26)]  # Hz, dB
    return high_pass(rings, 4, low_hz) + colour(slaps, slap_shape, lo=81)


def bubbles(rise=0.02, delay=0.0026, daughter_db=-7, daughter_cycles=1.8, trim_db=1, count=4):
    """A bubble pinches off and sheds a few daughters of nearly its size."""
    out = np.zeros(N)
    for s, db, hz, cycles, _, _ in AIR_PLOPS:
        add(out, s, amp(db + trim_db) * bubble(hz, max(cycles, 1), rise))  # swells for at least one cycle
        for late, ratio in zip(rng.exponential(1, count), rng.uniform(.65, 1.5, count)):
            daughter = bubble(hz * ratio, daughter_cycles, rise)
            add(out, s + delay * late, amp(db + trim_db + daughter_db) * daughter)
    return high_pass(out, 2, 500)


def thrown_back(x, echo_db=-12, wall_s=0.015):
    """The far side of the basin returns one quick echo."""
    return x + amp(echo_db) * np.interp(T - wall_s, T, x, left=0)


def smacks(hit_hz=7300, sharpness=5.0, trim_db=-2):
    """A drop smacks on the surface with a millisecond or two of bright noise."""
    # drops, level of the first 2 ms before trim and tone: [t/s, level/dB]
    drops = [(6.0423, -1), (6.0607, -10), (6.2866, -2.5), (6.3534, -11), (6.4365, -10), (6.5974, -6),
             (6.874, -9), (7.884, -11), (8.0845, -7.5), (8.556, -15)]
    out, t = np.zeros(N), np.arange(SR // 50) / SR
    for s, db in drops:
        snap = resonate(rng.standard_normal(len(t)) * np.exp(-t / .0016), hit_hz, hit_hz / sharpness)
        add(out, s, amp(db + trim_db) * snap / np.std(snap[:SR // 500]))
    return colour(out, [(8500, -10.5), (15000, -30)], 2300)


def clouds(sharpness=2.3, trim_db=-4, width_s=0.0077):
    """Each surge drives in a cloud of bubbles of one size, which rings around its own pitch."""
    out, t = np.zeros(N), np.arange(-SR // 20, SR // 20) / SR
    for s, db, hz in JET_SURGES:
        hz = min(hz, 8500)  # highest cloud
        spiky = rng.standard_normal(len(t)) ** 3
        cloud = resonate_twice(spiky, hz, hz / sharpness)
        add(out, s + t[0], amp(db + trim_db) * evened(cloud) * 2 ** (-(t / width_s) ** 2 / 2))
    return out


def lumpy(x, patchy_db, patch_hz, patch_s):
    """Clouds of like-sized bubbles come and go, lifting one band and then another; gain has rms 1."""
    hz, t, z = signal.stft(x, SR, nperseg=256, noverlap=192)
    places = np.meshgrid(hz / patch_hz, t / patch_s, indexing="ij")
    field = map_coordinates(rng.standard_normal((120, 1200)), places, order=1, mode="wrap")
    gain = evened(amp(patchy_db * evened(field)))
    return signal.istft(z * gain, SR, nperseg=256, noverlap=192)[1][:N]


def churn(spread_db=1.1, cycles=5, rise=0.032, cluster_s=.006, cluster_octaves=0.2, rush_db=-5,
          split_hz=1000, small_db=-1.0, large_db=2, count=1800, size=4):
    """Clusters of bubbles ring in the dense rush where the jet enters; large ones follow the gurgle curve."""
    # spectral shape of the churning: [f/Hz, level/dB]
    churn_shape = [(200, -46.5), (290, -27), (370, -8.5), (640, -9), (800, -10.5), (980, -8.5), (1100, -10),
                   (1300, 6.5), (1600, 5.5), (2150, 10), (3000, 0), (4500, -4.5)]
    out = np.zeros(N)
    for (when, pitch, force), *members in rng.random((count, size + 1, 3)):
        start = OPEN_S + when * (T[-1] - OPEN_S)
        for late, detune, part in members:
            hz = 330 * 13 ** pitch * 2 ** (cluster_octaves * (2 * detune - 1))
            db = -spread_db * np.log((force + .03) * (part + .03))
            add(out, start + 2 * cluster_s * late, amp(db) * hz * bubble(hz, cycles, rise))
    rush = colour(rng.standard_normal(N), [(4000, 0), (6000, -30)])
    out = running(out) + amp(rush_db) * running(rush)
    small = amp(small_db) * jet(order=2) * running(colour(out, churn_shape, lo=split_hz))
    large = amp(large_db) * jet(order=3) * running(colour(out, churn_shape, hi=split_hz))
    return small + large


def foam(spread_db=-0.5, cycles=72.0, count=14000):
    """Tiny bubbles ping, each at its own high pitch; rms 1 while the tap runs."""
    when, pitch, size = rng.random((count, 3)).T[:, :, None]
    hz, step = 2400 * 5.5 ** pitch, np.arange(600)
    turns = hz * step / SR
    strength = amp(-spread_db * np.log(size + 0.0067)) * hz
    fade = np.exp(-turns / cycles) * (1 - step / len(step))
    pings = strength * fade * np.sin(2 * np.pi * turns)
    start = OPEN_S * SR
    at = (start + when * (N - start)).astype(int) + step
    out = np.bincount(at.ravel(), pings.ravel(), N)[:N]
    return out / np.std(out[int(start):])


def spray(per_s=11000, spread_db=3.0, flutter_db=1, foam_db=0, steady_db=1, burst_db=0.5, surge_s=0.0082):
    """Tiny droplets and foam: a lumpy hiss that flares whenever the jet breaks up."""
    # spectral shape of the hiss: [f/Hz, level/dB]
    hiss_shape = [(1500, -25), (2500, 4.5), (3300, -3), (3900, 4.5), (4350, 2.5), (4900, 9.5), (5600, 4.5),
                  (6500, 6.5), (8200, 7.5), (10000, 0), (13000, -11), (16000, -12)]
    steady = (amp(steady_db) * jet()) ** 2
    power = steady + sum(swell_power(s, db + burst_db, surge_s) for s, db, _ in JET_SURGES)
    droplets = evened(grains(per_s, spread_db)) + amp(foam_db) * foam()
    fizz = lumpy(droplets, patchy_db=2.0, patch_hz=696, patch_s=.035)
    return np.sqrt(power) * amp(flutter_db * drift(120)) * evened(colour(fizz, hiss_shape))


def bowl(x, trim_db=-4):
    """The hollow of the basin colours the splashing."""
    # resonances of the hollow over the water, against the direct sound: [f/Hz, width/Hz, level/dB]
    bowl_modes = [(936, 140, -3), (1264, 54, -4), (3120, 104, 2), (3496, 72, -4), (6730, 31, -13)]
    return amp(trim_db) * hollow(x, bowl_modes)


def scene():
    """Handling, water and background in one room."""
    # handling: colour of the side echoes, then balance of left over right: [f/Hz, level/dB]
    dry_side = [(60, -1), (130, -22.5), (290, -2.5), (640, -5), (1410, -8), (3100, -14), (6820, -9),
                (15000, -2.5)]
    dry_balance = [(60, -1.5), (130, 2.5), (290, 0.5), (640, -2.5), (1410, -3), (3100, -4.5), (6820, -2.0),
                   (15000, -3)]
    # water: colour of the side echoes, then balance of left over right: [f/Hz, level/dB]
    wet_side = [(60, -18), (110, -40), (200, -12), (380, -14.5), (700, -8), (1290, -11.5), (2380, -10.5),
                (4400, -14), (8120, -8.5), (15000, -2.5)]
    wet_balance = [(60, 17), (110, -5), (200, 0), (380, -5), (700, 0), (1290, -2.5), (2380, -1),
                   (4400, -0.5), (8120, -1.0), (15000, 0.5)]
    blows = basin(knocks(), ring_db=-54.5) + carton_rings() + thumps()
    blows = room(blows, wet_db=-10.0, apart_db=-5.5, sides=dry_side, balance=dry_balance)
    powder = carton(slides()) + trickle()
    powder = room(powder, wet_db=-9.0, apart_db=-3.5, sides=dry_side, balance=dry_balance)
    splash = bowl(spray() + lumpy(churn(), patchy_db=2, patch_hz=350, patch_s=.05))
    splash = splash + clouds() + thrown_back(bubbles()) + smacks()
    depths = basin(gulps(), ring_db=-56.5) + burbles() + tap_body()
    # little echo: the jet is close to the microphones
    water = room(splash + depths, wet_db=-15, apart_db=-2.0, sides=wet_side, balance=wet_balance)
    return blows + powder + water + bird() + air()


def record(dry):
    """The recorder's band limit."""
    low_pass = signal.firwin(511, EDGE_HZ, window=("kaiser", 9), fs=SR)
    return signal.oaconvolve(dry, low_pass[None], "same")


dry = scene()
out = record(dry)
to_wav(out)
```